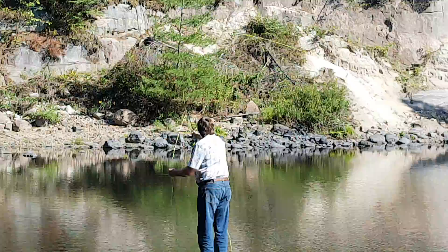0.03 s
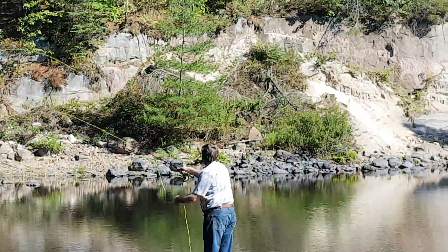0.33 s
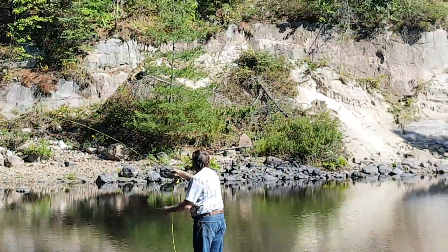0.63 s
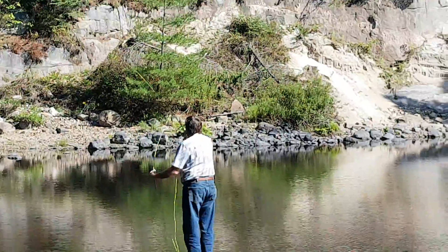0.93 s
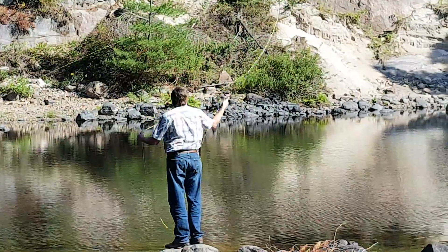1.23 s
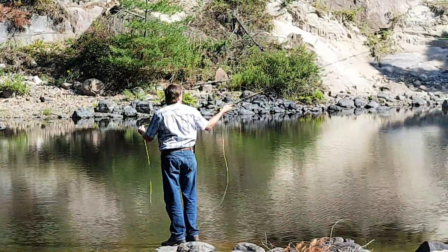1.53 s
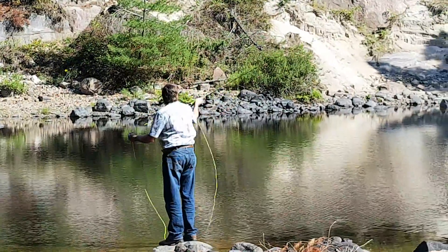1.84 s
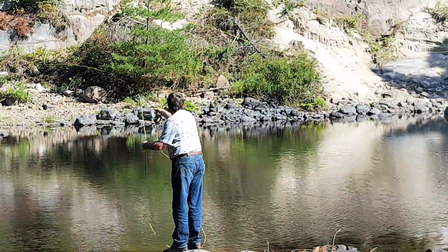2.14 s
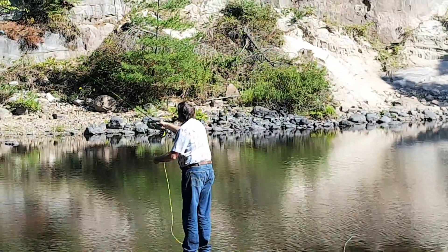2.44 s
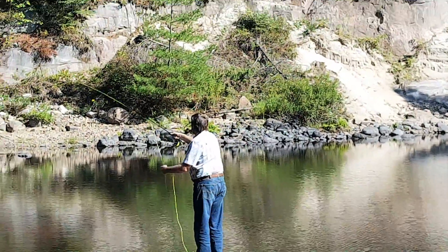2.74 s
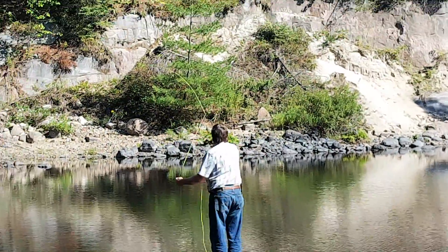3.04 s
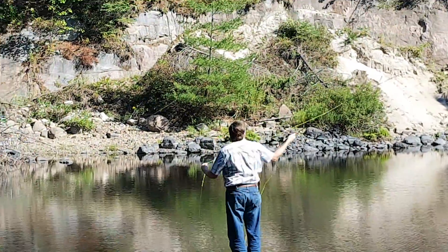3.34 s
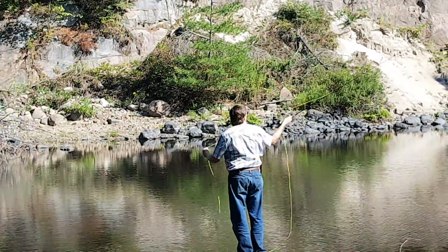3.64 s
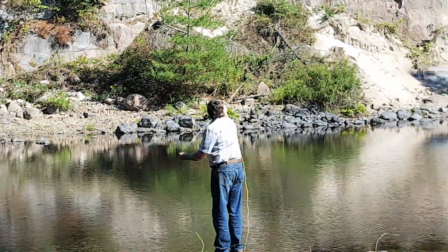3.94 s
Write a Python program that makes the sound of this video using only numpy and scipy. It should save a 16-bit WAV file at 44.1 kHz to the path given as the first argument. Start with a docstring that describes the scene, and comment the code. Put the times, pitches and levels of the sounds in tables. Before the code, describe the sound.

A shallow river runs steadily over stones, gurgling above a soft wash. Small bubbles plop close by, wavelets slap and spray crackles throughout, heard from the rocky bank with light gusts rumbling on the microphone.

```python
"""A shallow river running over stones, heard from the rocky bank on a two-port microphone.
Trapped air bubbles ring as a gurgle, the big ones plopping close in front; farther out they merge
into a soft wash. Wavelets slap on the stones, and spray crackles in the treble.
Light gusts of wind rumble on the two ports."""
import sys
import numpy as np
from scipy import signal
from scipy.io import wavfile

SR = 44100
rng = np.random.default_rng(int(sys.argv[2]) if len(sys.argv) > 2 else 0)


def wav_out(sig):
    """Save sig, one row per channel (or a flat mono array), as 16-bit PCM at SR to the path in sys.argv[1]."""
    wavfile.write(sys.argv[1], SR, np.round(np.clip(np.atleast_2d(sig).T, -1, 1) * 32767).astype(np.int16))


N = 176400
TIME = np.arange(N) / SR

# strength of the current: t/s, level/dB
FLOW_CURVE = [(.3, -1.5), (.6, 0.5), (2.1, 0.54), (3.5, 0.47), (3.75, -1.5), (4, 0.6)]
# the crowd of small bubbles, by pitch: f/Hz, relative level/dB
GURGLE_SPECTRUM = [(330, -8), (410, -2), (560, -6), (850, 2), (1350, 6.5), (1750, 2.5), (2400, 11),
                   (3100, 5.5), (4800, -2)]
# big bubbles close in front: t/s, f/Hz, relative level/dB, length/s, glide over that length/octaves
NEAR_BUBBLES = [(0.184, 1386, -30.5, 0.009, -0.23), (0.349, 434, -33.5, 0.015, -0.32),
                (0.502, 1090, -30.5, 0.015, -.4), (0.603, 1170, -30, 0.0073, .12),
                (0.669, 1850, -34, .007, .1), (0.71, 1250, -34, .006, 0.2),
                (0.727, 1350, -32, 0.011, -0.37), (0.832, 378, -34.5, .013, 0.2),
                (0.86, 1500, -27.5, 0.0087, 0.12), (0.868, 1210, -33.5, 0.0105, -0.2),
                (0.869, 2030, -33, 0.011, 0.25), (0.88, 2780, -23, 0.0031, 0.13),
                (0.934, 1390, -32.5, .007, .1), (1.276, 1477, -31.5, .017, -0.36),
                (1.291, 974, -27, 0.0067, -.14), (1.52, 670, -34.5, 0.013, 0.2),
                (1.537, 885, -36, 0.017, .15), (1.542, 455, -35.5, 0.013, 0.3),
                (1.573, 775, -31.5, 0.0062, .15), (1.596, 970, -39, 0.0097, 0.16),
                (2.078, 1330, -19.5, 0.0095, .01), (2.209, 520, -30.5, 0.0073, -0.07),
                (2.253, 765, -32, .027, .55), (2.346, 915, -33.5, 0.011, -0.06),
                (2.381, 2250, -22.5, .0044, 0.32), (2.404, 555, -31, 0.014, -.7),
                (2.489, 854, -40, .04, .6), (2.547, 475, -33.5, 0.0099, -0.06),
                (2.619, 425, -34.5, 0.012, -0.12), (2.744, 406, -35.5, 0.024, .01),
                (2.813, 1148, -32, 0.02, 0.17), (2.89, 825, -34, 0.0097, 0.34),
                (3.038, 2680, -32, 0.011, 0.1), (3.142, 490, -30.5, 0.0095, -0.36),
                (3.221, 1370, -32.5, .009, 0.23), (3.26, 416, -32, .022, 0.15),
                (3.278, 1216, -29.5, 0.0086, -0.05), (3.317, 526, -33.5, .023, 0.56),
                (3.349, 403, -38.5, 0.034, 0.2), (3.389, 762, -32, 0.019, 0.07),
                (3.47, 1278, -32, 0.022, 0.34), (3.525, 790, -34.5, 0.01, 0.57),
                (3.564, 1034, -37.5, 0.037, 0.04), (3.659, 763, -32.5, 0.014, -.12),
                (3.813, 740, -34.5, 0.025, -0.2), (3.824, 1340, -32, .007, 0.14),
                (3.929, 1237, -32.5, 0.018, 0.56)]
# the water farther out: f/Hz, relative level per Hz/dB
WASH_SPECTRUM = [(170, -28), (280, -9.5), (390, -3.5), (560, -3.5), (850, -0.5), (1350, -1.5), (1700, 0),
                 (2350, -0.5), (3000, -5.5), (4000, -12.5), (5400, -17.5), (8000, -19), (11500, -23),
                 (15500, -26)]
# wavelets on the stones: t/s, level/dB, decay/s
WAVELETS = [(0.502, -42, 0.0096), (0.605, -32, 0.0016), (0.952, -33, 0.017), (1.405, -33.5, 0.0035),
            (2.736, -37.5, 0.003), (2.989, -30.5, 0.0033), (3.082, -32, .005), (3.242, -34, 0.004),
            (3.414, -32, .0032)]
# droplets near the microphone: t/s, relative level/dB, f/Hz
NEAR_DROPLETS = [(1.068, -34, 8300), (1.1303, -34, 10100), (1.661, -29, 4340), (1.7445, -28, 4430),
                 (2.0044, -31.5, 8300), (2.1406, -29, 6740), (2.3886, -31.5, 7800), (2.397, -40, 11000),
                 (2.4992, -35, 8820), (2.5607, -34.5, 11000), (2.899, -29, 4540), (3.0065, -26.5, 4300),
                 (3.4838, -35, 6530), (3.609, -26.5, 4350)]
# fine spray: f/Hz, relative level per Hz/dB
SPRAY_SPECTRUM = [(600, -41), (1500, 8), (2800, 10.5), (4200, 2.5), (5500, 2), (7500, -1.5), (11500, -4),
                  (15500, -8.5)]
# the water is mostly louder on the left port, varying with pitch: f/Hz, left minus right level/dB
RIVER_BALANCE = [(300, -1), (750, 1.9), (2000, 0), (3300, 5.5), (5500, -4), (9000, 9.5), (15000, 2)]
# how alike the two ports hear the wash: f/Hz, likeness/(0 to 1)
PORT_LIKENESS = [(150, 0.65), (400, 1), (750, 1), (1200, 0.45), (2200, 0), (5000, 0.15)]
# the breeze at the microphone: t/s, relative level/dB
BREEZE_CURVE = [(.1, -63), (.5, -72), (1.27, -61.5), (1.5, -66), (1.85, -69), (2.03, -60.5), (2.35, -65.5),
                (2.6, -74), (3.9, -70)]
# short puffs on top of the breeze: t/s
PUFF_TIMES = [0.086, .2, .845, 1.09, 1.17, 1.299, 1.368, 2.01, 2.055, 2.37, 3.8]
# wind rumble on the ports: f/Hz, relative level per Hz/dB
RUMBLE_SPECTRUM = [(24, -8), (45, -2.5), (75, 2), (125, -6), (185, -6.5), (300, -11.5), (700, -50)]
# peak and dips in the ports' treble: f/Hz, width/Hz, level/dB
PORT_COLOUR = [(8500, 330, 3), (9940, 1750, -4), (5520, 2570, -5)]

RIVER_LAG_S = .0002   # the left port hears the river later


def gurgle(level_db=-43.5, per_s=750, cycles=9.1, spread_db=3):
    """Off the bank, small bubbles of random size and direction each ring for some cycles."""
    out, count = np.zeros((2, N)), int(per_s * N / SR)
    low_hz, high_hz = GURGLE_SPECTRUM[0][0], GURGLE_SPECTRUM[-1][0]
    for when, pitch in rng.random((count, 2)):
        size, length, glide, side = np.clip(rng.standard_normal(4), -2, 2)
        hz = low_hz * (high_hz / low_hz) ** pitch
        ring = bubble(hz, length_s=cycles / hz * np.exp(.343 * length),
                      glide_octaves=.083 + .19 * glide, lag_s=RIVER_LAG_S + .00021 * side)
        gain = from_db(at_hz(GURGLE_SPECTRUM, hz) + spread_db * size)
        add(out, when * N / SR, gain * pan(at_hz(RIVER_BALANCE, hz) + side) * ring)
    return from_db(level_db) * rms_one(out)


def bubble(hz, length_s, glide_octaves, lag_s):
    """One air bubble swells, rings and dies; the left port hears it lag_s later."""
    t = np.arange(int(2 * length_s * SR) + 2) / SR
    age_s = np.maximum(t - np.array([[lag_s], [0]]), 0)
    swell = age_s / (.27 * length_s)
    # the pitch slides ever faster as the bubble nears the surface
    pitch_hz = hz * 2 ** (glide_octaves * (age_s / length_s) ** 1.47)
    turns = np.cumsum(pitch_hz * np.diff(age_s, prepend=0), axis=1)
    return swell * np.exp(1 - swell) * np.sin(2 * np.pi * turns)


def plops(gain_db=-2.5):
    """Single big bubbles ring close in front of the microphone."""
    out = np.zeros((2, N))
    for s, hz, db, length_s, glide in NEAR_BUBBLES:
        add(out, s, from_db(db + gain_db) * pan(db=1) * bubble(hz, length_s, glide, lag_s=.00003))
    return out


def wash(level_db=-42):
    """Farther out, countless bubbles merge into a flickering rush."""
    left, right = banded_noise(WASH_SPECTRUM, flicker_db=2, flicker_hz=17,
                               likeness=PORT_LIKENESS, balance=RIVER_BALANCE)
    late_left = np.interp(TIME - RIVER_LAG_S, TIME, left)
    return from_db(level_db) * np.array([late_left, right])


def slaps(band_hz=(1140, 2770)):
    """Wavelets break on the stones in front with a short, wet splash."""
    out, t = np.zeros((2, N)), TIME[:SR // 10]
    band = signal.butter(2, band_hz, "band", fs=SR, output="sos")
    for s, db, decay_s in WAVELETS:
        splash = rms_one(signal.sosfilt(band, rng.standard_normal(len(t))))
        add(out, s, from_db(db) * pan(db=1) * splash * np.exp(-t / decay_s))
    return out


def snaps(gain_db=-3.5, decay_s=.0017, q=5.7):
    """Close droplets burst with a short, bright crack, louder on the left port."""
    out, t = np.zeros((2, N)), TIME[:SR // 50]
    for s, db, hz in NEAR_DROPLETS:
        radius = np.exp(-np.pi * hz / (q * SR))
        resonance = [1, -2 * radius * np.cos(2 * np.pi * hz / SR), radius ** 2]
        crack = rms_one(signal.lfilter([1, 0, -1], resonance, rng.standard_normal((2, len(t)))))
        add(out, s, from_db(db + gain_db) * pan(db=7) * crack * np.exp(-t / decay_s))
    return out


def spray(level_db=-51.5, per_s=410, clump_db=2, attack_s=.00026, decay_s=.001):
    """Fine droplets land in clumps; each is a brief tick with its own colour."""
    landings = rng.random(N) < per_s * from_db(clump_db * drift(hz=25)) / SR
    tick_db = np.minimum(7.5 * rng.exponential(1, N), 11)
    power = landings * from_db(tick_db) ** 2 + 1e-18
    for time_s in (attack_s, decay_s):
        power = signal.lfilter([1], [1, -np.exp(-2 / (time_s * SR))], power)
    hiss = banded_noise(SPRAY_SPECTRUM, flicker_db=3.8, flicker_hz=41, balance=RIVER_BALANCE)
    return from_db(level_db) * rms_one(np.sqrt(power) * hiss)


def current(water, surge_db=.5, splash_hz=2690, width_hz=1400):
    """The flow surges quickly and slightly; stronger flow makes the water louder and splashier."""
    flow = in_time(FLOW_CURVE) * from_db(surge_db * drift(hz=18))
    surging = flow * water
    return peak_filter(surging, splash_hz, width_hz, gain=flow ** .8)


def wind(gain_db=5.5, puff_db=9, puff_width_s=.017):
    """A breeze with short puffs rumbles on each port separately, harder on the left."""
    puffs = sum(np.exp(-((TIME - s) / puff_width_s) ** 2) for s in PUFF_TIMES)
    force = in_time(BREEZE_CURVE) * (1 + from_db(puff_db) * puffs)
    rumble = banded_noise(RUMBLE_SPECTRUM, flicker_db=.5, flicker_hz=20)
    return from_db(gain_db) * force * pan(db=5.5) * rumble


def banded_noise(spectrum, flicker_db, flicker_hz, likeness=None, balance=None):
    """Third-octave bands of stereo noise, each with its own level, flicker, likeness and side; rms 1."""
    low_hz, high_hz = spectrum[0][0], min(spectrum[-1][0] * 1.1, SR * .45)
    edges = np.geomspace(low_hz, high_hz, round(3 * np.log2(high_hz / low_hz)) + 1)
    out, white = 0, rng.standard_normal((2, 2, N))
    for k, band in enumerate(zip(edges, edges[1:])):
        mid, side = signal.sosfilt(signal.butter(2, band, "band", fs=SR, output="sos"), white[k % 2])
        hz = np.sqrt(band[0] * band[1])
        alike = np.clip(at_hz(likeness, hz), 0, 1) if likeness else 0
        stereo = np.sqrt(1 + alike) * mid + np.sqrt(1 - alike) * side * [[1], [-1]]
        gain = from_db(at_hz(spectrum, hz) + flicker_db * drift(flicker_hz))
        out = out + gain * pan(at_hz(balance, hz) if balance else 0) * stereo
    return rms_one(out)


def drift(hz):
    """A random wander with spread 1, mostly slower than hz."""
    step, settle = 40, 2000
    pole = np.exp(-2 * np.pi * hz * step / SR)
    white = rng.standard_normal(N // step + settle + 2)
    slow = signal.lfilter([1], [1, -2 * pole, pole ** 2], white)[settle:]
    return np.interp(np.arange(N) / step, np.arange(len(slow)), rms_one(slow))


def peak_filter(x, hz, width_hz, gain):
    """Lifts or lowers one band."""
    return x + (gain - 1) * signal.lfilter(*signal.iirpeak(hz, hz / width_hz, fs=SR), x)


def from_db(db):
    return 10 ** (np.asarray(db) / 20)


def rms_one(x):
    return x / np.sqrt(np.mean(x ** 2) + 1e-20)


def in_time(rows):
    """Gain that follows a curve of t/s, level/dB."""
    return from_db(np.interp(TIME, *np.transpose(rows)))


def at_hz(points, hz):
    """Reads a spectrum on a log-frequency axis."""
    freqs, values = np.transpose(points)
    return np.interp(np.log(hz), np.log(freqs), values)


def pan(db):
    """Port gains at constant power, the left louder by db."""
    return rms_one(from_db(np.array([[db], [-db]]) / 2))


def add(out, s, sound):
    """Mixes a stereo sound in at s seconds."""
    i = int(s * SR)
    out[:, i:i + sound.shape[1]] += sound[:, :max(N - i, 0)]


def scene():
    """From the bank: the running river, the nearer water sounds on top, and wind on the microphone."""
    return current(gurgle() + wash() + spray()) + plops() + slaps() + snaps() + wind()


def record(dry, start_s=.069, cutoff_hz=15750):
    """The ports colour the treble, the microphone opens after a moment, the top is cut."""
    for hz, width_hz, db in PORT_COLOUR:
        dry = peak_filter(dry, hz, width_hz, from_db(db))
    lowpass = signal.ellip(12, .1, 70, cutoff_hz, fs=SR, output="sos")
    return signal.sosfilt(lowpass, dry * (TIME > start_s))


dry = scene()
out = record(dry)
wav_out(out)
```